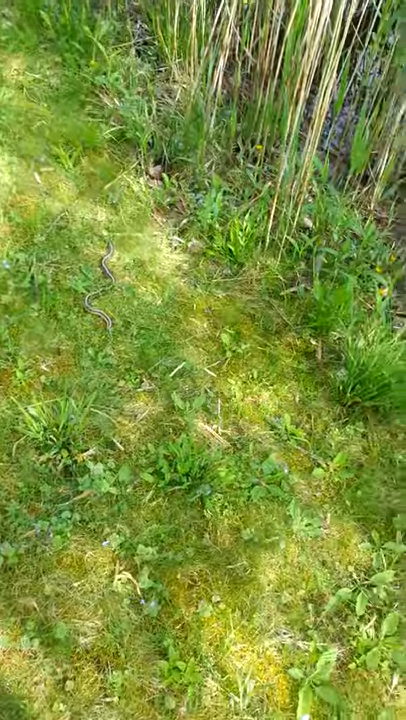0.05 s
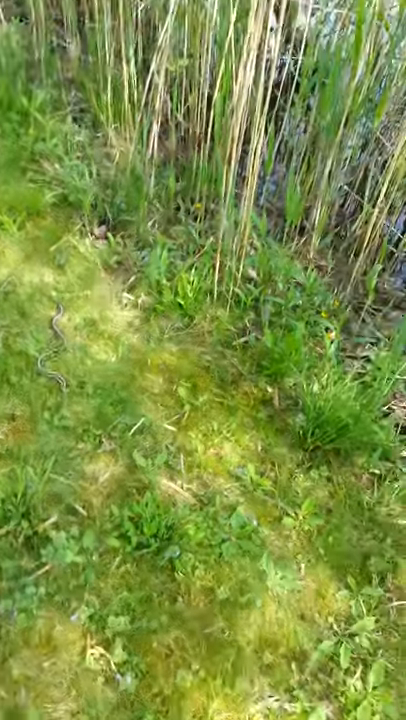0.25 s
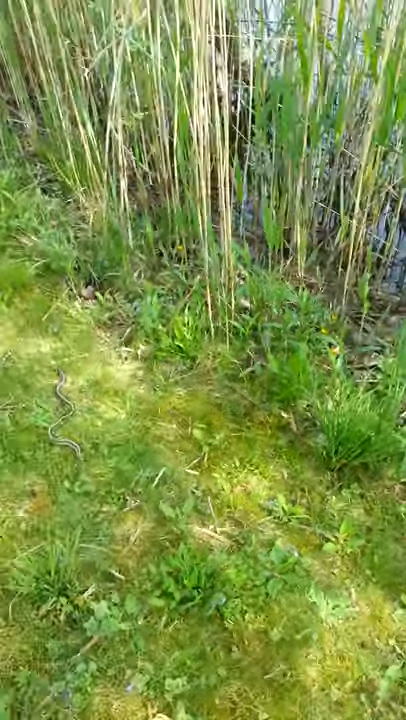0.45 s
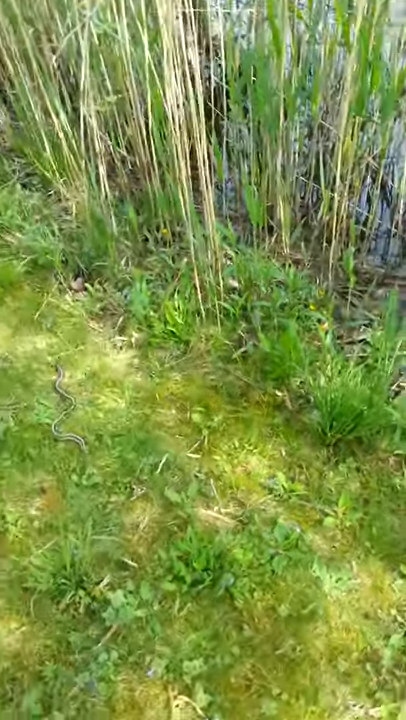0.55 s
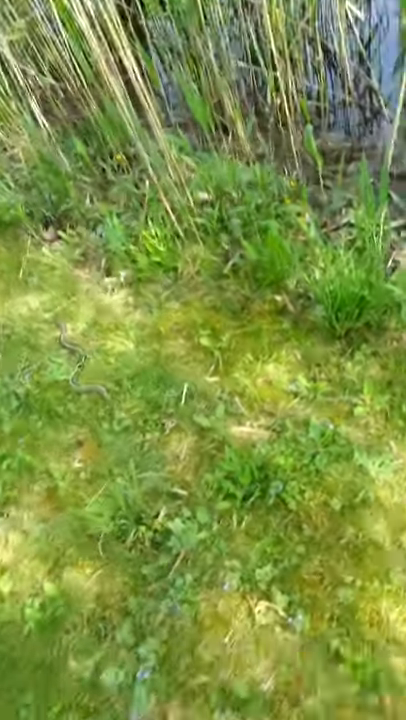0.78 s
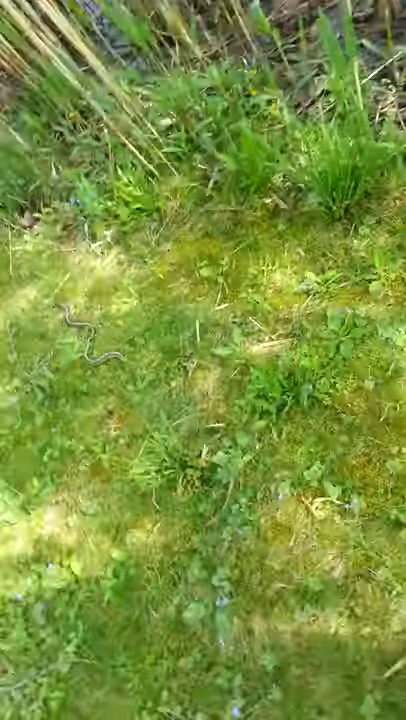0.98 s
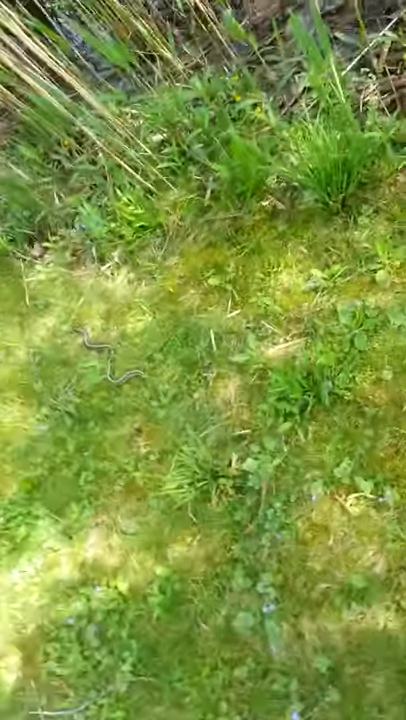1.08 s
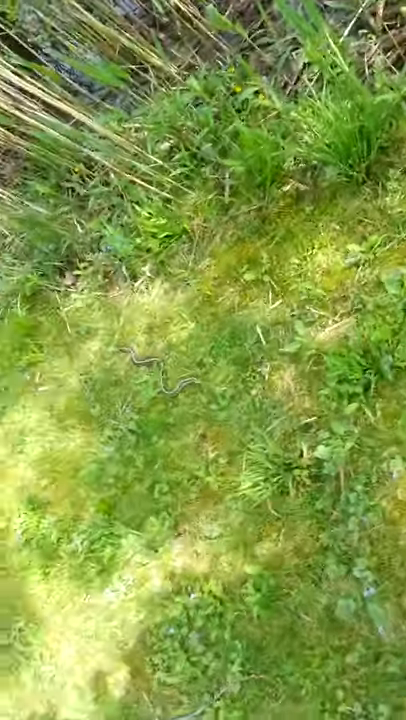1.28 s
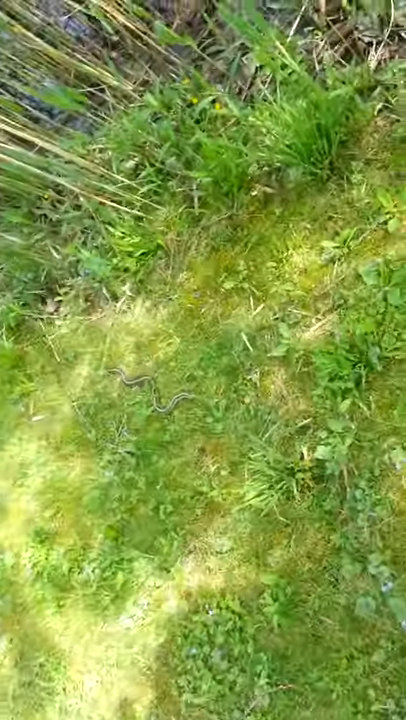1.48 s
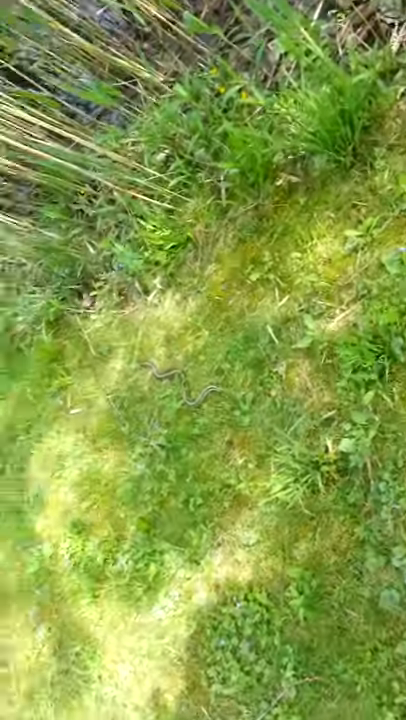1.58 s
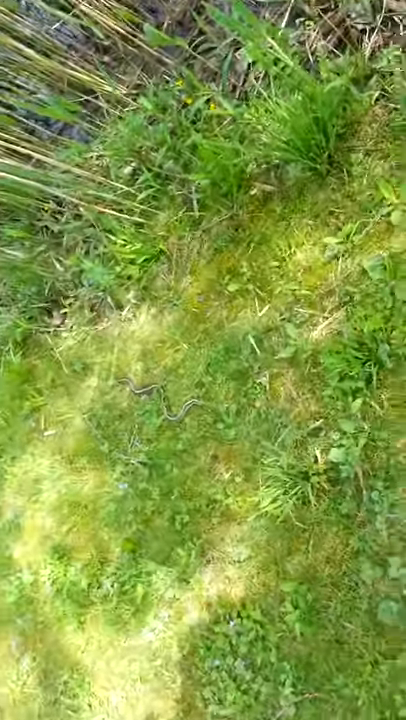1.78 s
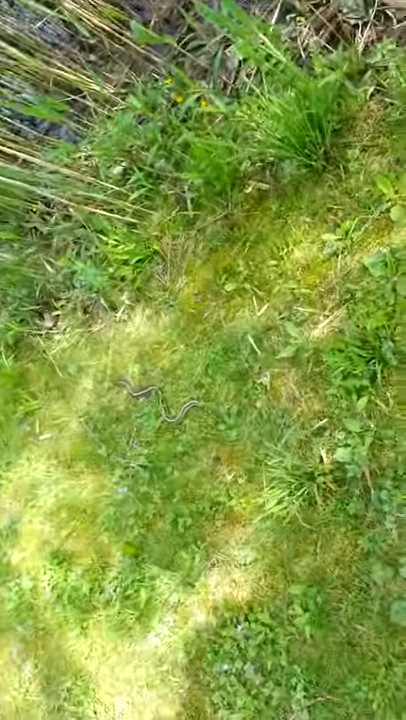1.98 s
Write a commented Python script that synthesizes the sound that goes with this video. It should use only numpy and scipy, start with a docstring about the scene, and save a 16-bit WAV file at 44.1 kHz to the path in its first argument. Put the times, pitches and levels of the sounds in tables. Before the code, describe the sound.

Handling noise from a hand shifting its grip on a phone, right at the microphone. Skin rubs and fingers knock, the hardest knock bringing a low thump, then comes one hollow swish. Faint outdoor rumble and hiss lie underneath.

```python
"""Close rubbing, sharp knocks and one hollow swish, over a faint outdoor rumble and hiss.
A hand shifts its grip on a phone carried over a grassy bank. Skin slides over the case in
tiny slips beside the left and right microphone ports (openings), and knocking fingers make
the case ring briefly. A low pressure thump at the right port comes with the hardest knock.
The swish comes from a slide with the palm cupped over the left port."""
import sys
import numpy as np
from scipy import signal
from scipy.fft import rfft, irfft
from scipy.io import wavfile
from scipy.ndimage import uniform_filter1d

SR = 44100
rng = np.random.default_rng(int(sys.argv[2]) if len(sys.argv) > 2 else 0)


def output_pcm(signal):
    """Save a mono or channel-first signal as 16-bit PCM at the path in sys.argv[1].

    Samples are clipped to [-1, 1] before scaling.
    """
    pcm = np.clip(np.atleast_2d(signal).T, -1, 1) * 32767
    wavfile.write(sys.argv[1], SR, np.round(pcm).astype(np.int16))


N = 90404
START_S = 0.135  # silence until here


def undb(db):
    """Turn decibels into a gain to multiply by."""
    return 10 ** (np.asarray(db) / 20)


def unit(x):
    """Scale a sound to an average (rms) level of 1."""
    return x / np.sqrt(np.mean(x ** 2))


def freqs(size=N):
    """The frequency in Hz of each point of a spectrum, at least 1."""
    return np.maximum(np.arange(size // 2 + 1) * SR / size, 1)


def colour(points):
    """A tone curve: gains along a line through (f/Hz, level/dB) points."""
    hz, db = np.array(points).T
    return undb(np.interp(np.log(freqs()), np.log(hz), db))


def resonance(hz, width, size=N):
    """A filter that rings at one frequency, with gain 1 there."""
    s = 1j * freqs(size)
    return s * width / (s * s + s * width + hz * hz)


def lowpass(hz, size=N):
    """A filter that dulls everything above hz."""
    s = 1j * freqs(size) / hz
    return 1 / (s * s + np.sqrt(2) * s + 1)


def wander(rate_hz):
    """A smooth random drift, mostly between -1 and 1."""
    hold = int(SR / rate_hz)
    steps = np.repeat(rng.standard_normal(N // hold + 1), hold)
    return uniform_filter1d(steps, hold)[:N]


def waver(sound, depth_db, rate_hz):
    """Let each octave of a sound drift in level on its own."""
    spectrum, octave = rfft(sound), np.log2(freqs())
    bands = (irfft(spectrum * np.maximum(1 - abs(octave - k), 0), N) for k in range(4, 16))
    return sum(band * undb(depth_db * wander(rate_hz)) for band in bands)


def ports(pan_db):
    """Left and right gains; pan is left minus right, and the nearer port has gain 1."""
    return undb(np.minimum([[pan_db], [-pan_db]], 0))


def stroke(start_s, length_s, attack_s, release_s):
    """The speed of a slide, from 0 to 1: it picks up, then slows to a stop."""
    t = np.arange(N) / SR
    return np.clip(np.minimum((t - start_s) / attack_s, (start_s + length_s - t) / release_s), 0, 1)


def slips(per_second=14000, spread_db=3):
    """Sliding skin moves in many tiny slips: random clicks, unrelated at the two ports."""
    strength = rng.choice([-1, 1], (2, N)) * undb(spread_db * rng.standard_normal((2, N)))
    return (rng.random((2, N)) < per_second / SR) * strength


def finger_slides(hollow_q=5, shade_q=1.73, overtone_share=0.17):
    """Slips stir the case and the hollow under the finger, while the pressure wavers."""
    # tone of skin rubbing the case: f/Hz, level/dB
    rub_tone = [(100, -36), (300, -9), (620, -3), (920, -7), (1400, 1.5), (2100, -1), (2900, -4),
                (4400, -3.5), (6200, -8), (10500, -16), (14500, -28.5)]
    # slides: start/s, length/s, attack/s, release/s, level/dB, pan/dB, hollow f/Hz, its lift/dB,
    # treble tilt/(dB per octave), f/Hz that the finger shades (muffles), shade depth/(0-1)
    slides = [(0.132, 0.051, 0.0089, 0.09, -29.5, 27, 1940, 2, -4.5, 2930, 0),
              (0.191, 0.11, 0.014, 0.039, -34.5, 12, 5000, 8, -3.8, 2780, 0.24),
              (0.281, 0.26, 0.14, 0.098, -25.5, 9.5, 1610, 3.5, -1.36, 1000, 0.14),
              (0.511, 0.19, 0.036, 0.031, -28.5, 5.5, 1620, 0.5, -1.7, 4570, 0),
              (0.676, 0.11, 0.04, 0.042, -21, 13.5, 3020, 10, 1.85, 8100, 0.12),
              (0.728, 0.22, 0.09, 0.023, -26.5, 8, 1250, 1.5, -3, 6500, 0.2),
              (0.664, 0.2, 0.13, .05, -23.5, -24, 4670, 10, 6, 6700, .5),
              (0.83, 0.067, 0.019, 0.023, -24, -22, 4570, -10, 10, 445, 0.3),
              (0.931, 0.072, .006, 0.086, -22, -6.5, 2160, -1.5, 1.5, 6300, 0.5),
              (0.988, 0.13, 0.026, .03, -44, -11, 1840, 2, 1.5, 6060, 0.5),
              (1.06, 0.088, 0.03, 0.042, -30.5, -9, 2970, 6.5, 1, 5960, 0.4),
              (1.133, 0.17, 0.033, 0.11, -27.5, -9, 1990, 5.5, 0.66, 5700, 0.36),
              (1.215, 0.23, 0.077, 0.12, -37, 0.5, 4260, 8, -3.9, 2860, 0.27),
              (1.273, 0.089, 0.031, 0.019, -38, 10, 4630, 16, 11, 2780, .6),
              (1.348, 0.16, 0.024, 0.034, -29, -5.5, 1800, 4, -0.76, 5370, 0.5),
              (1.572, 0.079, 0.0072, 0.016, -41.5, 8, 1530, 3, -1, 3000, .4),
              (1.784, 0.21, 0.01, 0.18, -38, 13, 1320, 4, -13, 2800, 0.2),
              (1.909, 0.1, 0.067, 0.017, -40.5, 21, 1833, -11, -3, 3155, 0.7)]
    patchy_slips = [waver(side, depth_db=2.8, rate_hz=21.8) for side in slips()]
    rub = rfft(np.array(patchy_slips)) * colour(rub_tone)
    out = np.zeros((2, N))
    for *timing, db, pan_db, hz, lift_db, tilt_db, shade_hz, depth in slides:
        width = hz / hollow_q  # a higher q gives a narrower band
        cavity = resonance(hz, width) + overtone_share * resonance(2 * hz, 2 * width)
        hollow = 1 + (undb(lift_db) - 1) * cavity
        shade = 1 - depth * resonance(shade_hz, shade_hz / shade_q)
        tilt = undb(tilt_db * np.log2(np.maximum(freqs() / 1000, 1)))
        slide = unit(irfft(rub * hollow * shade * tilt, N))
        out += slide * stroke(*timing) * undb(db) * ports(pan_db)
    pressure_db = 1.41 * wander(rate_hz=44.35)
    return out * undb(pressure_db)


def outdoor_air(level_db=-44.5, alike_below_hz=158, rumble_rise_s=0.19):
    """Faint rumble and hiss; the bass is alike on both sides and comes up more slowly."""
    # tone of the outdoor air: f/Hz, level/dB
    air_tone = [(25, -56), (45, -15.5), (70, -8), (130, -4), (250, -8), (450, -17), (700, -12.5),
                (1100, -19), (1800, -18), (2800, -28.5), (4400, -24.5), (6500, -31.5), (14000, -37.5)]
    noise = rfft(rng.standard_normal((2, N))) * colour(air_tone)
    middle = irfft(noise[0], N)
    side = irfft(noise[1] * freqs() / (freqs() + alike_below_hz), N)
    air = unit(np.array([middle + side, middle - side])) * undb(level_db)
    rumble = irfft(rfft(air) * abs(lowpass(hz=412)), N)
    rise = np.clip((np.arange(N) / SR - START_S) / rumble_rise_s, 0, 1)
    return air - rumble * (1 - rise)


def finger_knocks(size=4096):
    """A short push rings the case, duller for a softer touch, with a tick and a brief scuff."""
    # ways the case rings (one thud, two body, two tick): f/Hz, time to fade by 60 dB/s, level/dB
    case_modes = [(616, 0.0038, 12.5), (1337, 0.0049, 7), (1790, 0.0024, 6.5), (4400, 0.0022, 6.5),
                  (6980, 0.006, -12.5)]
    # knocks: t/s, level/dB, pan/dB, sharpness of the touch/Hz, thud weight/dB, tick weight/dB
    knocks = [(0.2074, -9, 6.5, 2210, -1.5, -1), (0.2267, -15.5, 10, 2000, 7, -23),
              (0.231, -8, 27, 2400, -20, -13), (.298, -21, 15, 1200, 13, -18), (.338, -4, 9, 1830, -6, -7),
              (0.5157, -3, 10, 1800, -10, -6.5), (0.5515, -3.5, 5, 1850, -8.5, -14),
              (0.5729, -5, 11, 1880, -9.5, -9), (.9018, 0.5, 11.5, 1760, 2, -9),
              (.9272, 8, -12, 3000, -2, 7), (.9308, -6, -7, 2200, 0, -6), (.9412, 2, -12, 2800, -6, -5),
              (.9667, -13, -6, 2200, -18, -6), (.972, -12, -14, 1700, -19, -28),
              (1.0805, -2, 11, 1000, 2, -13), (1.1706, -15.5, 7.5, 780, 2, -18),
              (1.5742, -11, 8.5, 2940, -2, 0.5), (1.5924, -10, 10, 1450, 7, 5),
              (1.671, -15.5, 10, 595, 10, -35), (1.676, -22, 1.5, 590, 16, -35),
              (1.6944, -2.5, 9, 970, -1, -38), (1.9401, -14.5, 11, 3000, -4.5, 0.5)]
    thud_low_hz, body_low_hz, tick_top_hz = 104, 580, 9800
    scuff_db, scuff_fade_s, port_lag_s = -24.5, 0.021, 0.0001
    t, s = np.arange(size) / SR, 1j * freqs(size)
    modes = [undb(db) * resonance(hz, np.log(1000) / np.pi / fade, size) for hz, fade, db in case_modes]
    taper = np.minimum(2 - 2 * t / t[-1], 1) ** 2
    out = np.zeros((2, N + size))
    for at, db, pan_db, touch_hz, thud_db, tick_db in knocks:
        thud = undb(thud_db) * modes[0] * (s / (s + thud_low_hz)) ** 2
        body = (modes[1] + modes[2]) * s / (s + body_low_hz)
        tick = undb(tick_db) * sum(modes[3:]) * lowpass(tick_top_hz, size)
        ring = (thud + body) * lowpass(touch_hz, size) + tick
        ring /= abs(irfft(ring)).max()
        scuff = undb(scuff_db) * rng.standard_normal((2, size)) * np.exp(-np.log(1000) * t / scuff_fade_s)
        lag = port_lag_s * np.array([[pan_db < 0], [pan_db > 0]])  # the far port hears it later
        push = (1 + rfft(scuff)) * np.exp(-2 * np.pi * s * lag)  # the 1 is a single click
        first = int(at * SR)
        out[:, first:first + size] += irfft(push * ring) * taper * undb(db) * ports(pan_db)
    return out[:, :N]


def low_thump(at_s=0.9272, rise_s=0.0014, level_db=-21):
    """A low pressure thump at the right port, together with the hardest knock."""
    age = np.maximum(np.arange(N) / SR - at_s, 0) / rise_s
    return age * np.exp(1 - age) * undb(level_db) * ports(pan_db=-26)


def cupped_slide(level_db=-27.5):
    """Slips ring the air inside the cupped palm: a hollow, almost whistling swish."""
    # resonances of the cupped palm: f/Hz, width/Hz, level/dB
    palm_modes = [(623, 460, 1), (1720, 1300, 2), (3560, 720, -0.5), (5060, 1500, -15), (6760, 1460, -6),
                  (11600, 2200, -13.5)]
    palm = sum(undb(db) * abs(resonance(hz, width)) ** 2 for hz, width, db in palm_modes)
    swish = unit(irfft(rfft(slips()) * palm, N))
    speed = stroke(start_s=1.6174, length_s=0.23, attack_s=0.079, release_s=0.097)
    return swish * speed * undb(level_db) * ports(pan_db=12)


def scene():
    """The sounds of the hand close to the ports, over the outdoor air."""
    return finger_slides() + outdoor_air() + finger_knocks() + low_thump() + cupped_slide()


def record(dry):
    """The phone fades in from silence, clips the hardest knocks and cuts the highest treble."""
    fade_in_s, top_hz = 0.11, 14700
    t = np.arange(N) / SR
    fade_in = np.sqrt(np.clip((t - START_S) / fade_in_s, 0, 1))
    clipped = np.clip(dry * fade_in, -1, 1)
    treble_cut = signal.ellip(8, 0.2, 70, top_hz, fs=SR, output="sos")
    return signal.sosfilt(treble_cut, clipped)


dry = scene()
out = record(dry)
output_pcm(out)
```